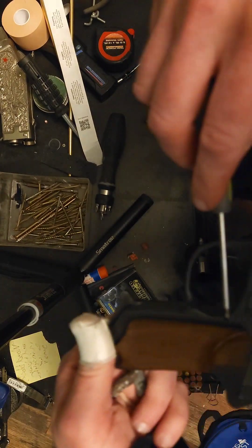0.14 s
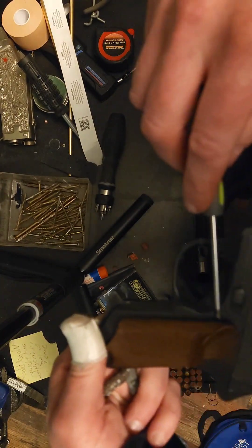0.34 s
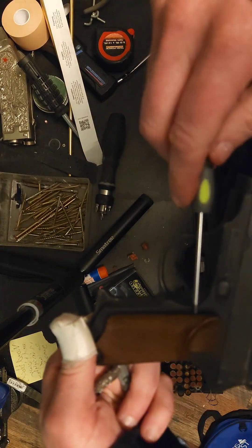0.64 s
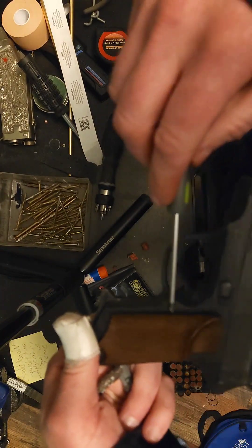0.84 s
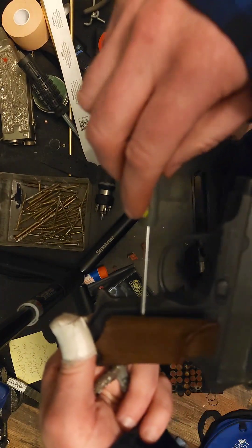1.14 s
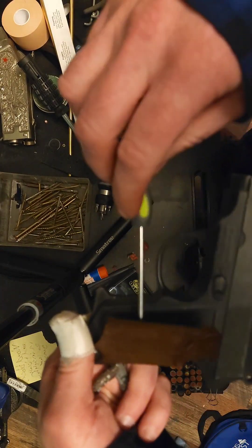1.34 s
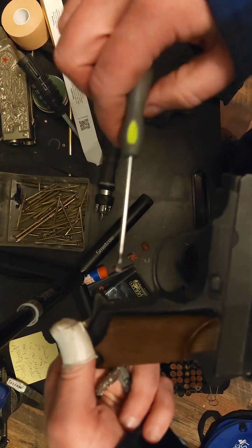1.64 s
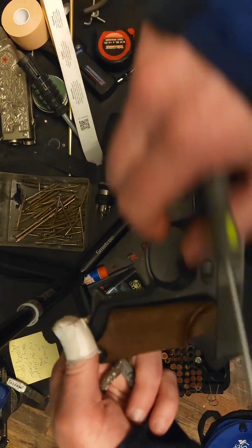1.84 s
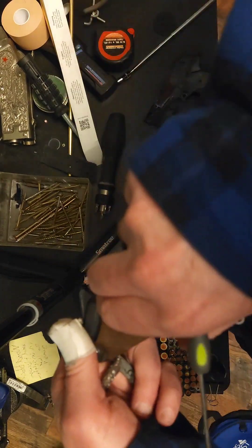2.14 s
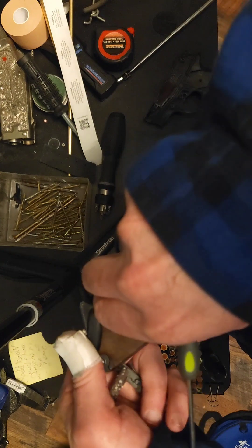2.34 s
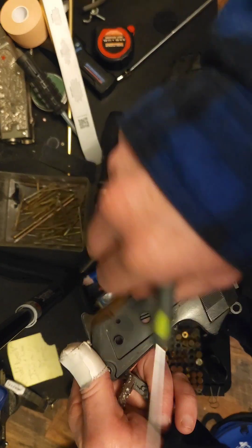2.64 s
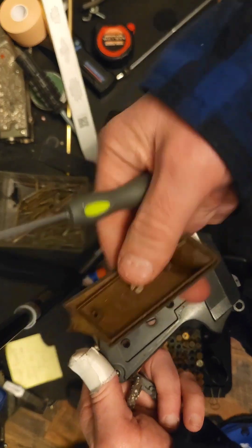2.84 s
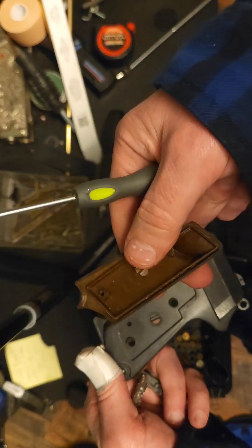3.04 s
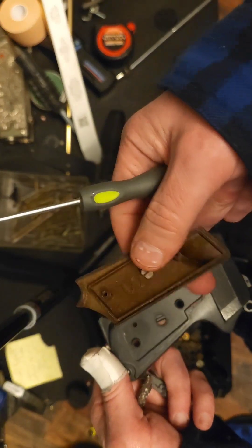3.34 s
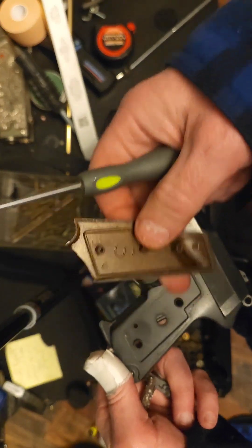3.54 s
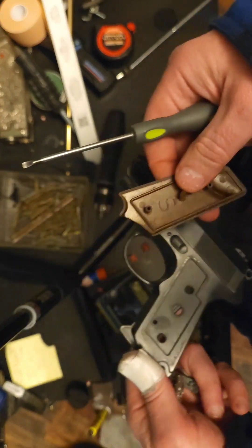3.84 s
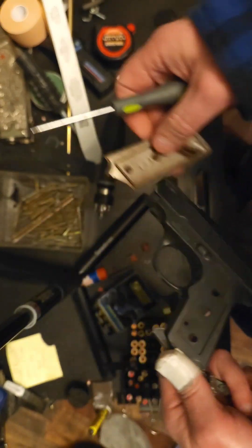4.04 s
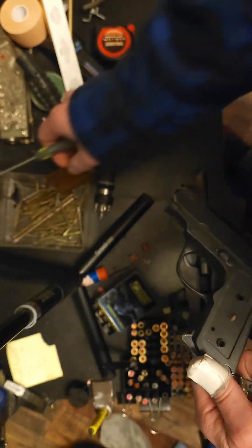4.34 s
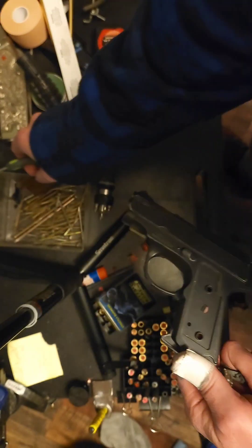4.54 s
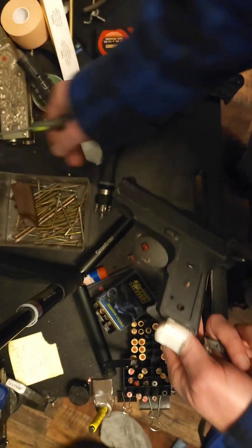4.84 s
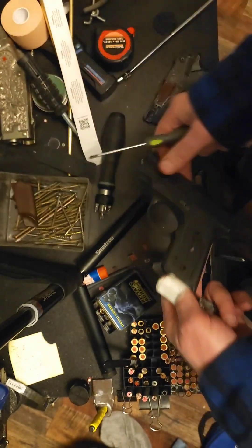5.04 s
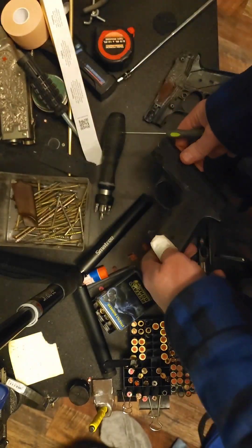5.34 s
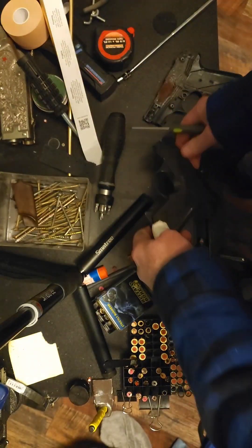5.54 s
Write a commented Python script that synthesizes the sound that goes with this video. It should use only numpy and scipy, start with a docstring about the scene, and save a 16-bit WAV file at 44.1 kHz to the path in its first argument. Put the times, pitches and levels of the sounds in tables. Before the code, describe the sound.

Close, quiet workbench sounds over constant mains hum and soft ventilation. A screwdriver blade scrapes and ticks in a screw, then snaps off sharply at about one and a half seconds. Faint knocks, squeaks and rubs follow as a grip panel comes loose. After a near-quiet gap it clatters into a box of screws and rocks to rest, with soft hand bumps last. Stereo microphone, short room reverberation.

```python
"""Over steady mains hum and ventilation noise, a small screwdriver scrapes and ticks on a metal toy,
then snaps off a screw; the grip panel squeaks and rubs loose, then lands in a box of brass screws and
rocks to rest. Sleeves, fingertips and forearm move throughout, with soft bumps of the hands at the end.
Impacts and rubbing are shaped noise exciting resonant bodies; squeaks and hum are sines.
A short, diffuse workshop reverberation follows the sounds of the toy, hands and box."""
import sys
import numpy as np
from scipy import signal
from scipy.fft import rfft, irfft
from scipy.io import wavfile

SR = 44100
rng = np.random.default_rng(int(sys.argv[2]) if len(sys.argv) > 2 else 0)


def dump(signal):
    """Clip the signal to [-1, 1] and save it as 16-bit WAV at the path in sys.argv[1]."""
    limited = np.clip(np.atleast_2d(signal).T, -1, 1)
    pcm = np.round(limited * 32767).astype(np.int16)
    wavfile.write(sys.argv[1], SR, pcm)


N = 251370
T = np.arange(N) / SR  # time [s]
SIZE = 16384  # samples in a body response or a blow, and knots in a random walk
TOP_HZ = 16000  # upper band edge

# ventilation rumble and hiss: (frequency [Hz], level [dB])
AIR_COLOUR = [(25, -13), (50, -17.5), (72, -1.5), (100, -4.5), (125, 1.5), (160, -7.5), (203, 1),
              (260, -17.5), (400, -21), (700, -25), (1200, -31.5), (2200, -33), (5000, -43.5),
              (9000, -49.5), (15000, -45)]
AIR_DB, HUM_HZ, HUM_DB = -62, 120, -62.5

# pushes of the blade in the screw slot: (start [s], length [s], drive level [dB])
SCRAPE_STROKES = [(.07, 0.056, -66.5), (.285, 0.098, -74.5), (.475, 0.035, -75), (.66, 0.065, -68),
                  (.838, 0.095, -51), (.965, 0.13, -52), (1.05, .2, -66.5), (1.205, 0.066, -63),
                  (1.27, 0.077, -70.5), (1.35, 0.1, -71.5), (1.47, 0.17, -57)]
# broad colour of the blade: (frequency [Hz], level [dB])
BLADE_COLOUR = [(300, -28.5), (1100, -14), (2200, -7), (4000, 0.5), (5200, -10), (6200, -14), (7300, -15),
                (8500, -15.5), (10000, -17), (12500, -14), (15000, -9.5)]
# blade held against the screw: (frequency [Hz], t60 [s], level over the broad colour [dB])
BLADE_RESONANCES = [(3400, .017, 20), (4310, .008, 8), (4860, .016, 19), (7170, .013, 19), (7750, .01, 10),
                    (9450, .008, 12), (11150, .01, 12)]
# frame rasping under a hard-pressed blade: (frequency [Hz], level [dB])
RASP_COLOUR = [(300, -24), (1200, -11.5), (2300, -6.5), (3500, -0.5), (6500, -8), (10000, -15),
               (15000, -11)]
# resonances of the rasping frame: (frequency [Hz], t60 [s], level over the broad colour [dB])
RASP_RESONANCES = [(2244, 0.019, 8), (2980, 0.028, 8), (5187, .025, 9.7), (5800, .025, 6)]

# forearm shuffling over the bench: (start [s], length [s], level [dB])
SHUFFLE_STROKES = [(.07, 0.088, -66), (1.95, 0.071, -63.5), (2.02, 0.24, -71.5), (2.35, .07, -67.5),
                   (2.67, 0.075, -67.5), (2.78, 0.034, -71.5), (2.83, 0.047, -67), (4.35, 0.11, -72.5),
                   (4.48, 0.45, -71), (4.68, 0.13, -63.5), (5.48, 0.18, -81)]
# broad colour of the forearm on the bench: (frequency [Hz], level [dB])
ARM_COLOUR = [(200, -14.5), (450, -4), (800, 0), (1050, -2), (1450, -2), (2200, -6.5), (3500, -17),
              (8000, -27.5)]

# blade and panel clacking on the frame:
# (time [s], level [dB], bass [dB], treble [dB], chatter decay [ms])
FRAME_TICKS = [(.101, -56, 12, -32, 25.6), (.8155, -60.5, 8, -29, 2.1), (.9075, -34.5, -8, 6, 1.72),
               (.927, -57, -1, -31, 9.9), (.940, -46, -7, -14, 8.8), (.973, -50, -2, -31, 12),
               (1.520, -20, -2, 4, 1.9), (1.5395, -30.5, 0, 5.5, 5.7), (1.5585, -32.5, 2.5, -6.5, 9.7),
               (1.5935, -43.5, 7, -4.5, 7.1), (1.611, -53.5, 9, -5, 1.8), (2.1825, -46, 7.5, 4, 3.3),
               (2.1895, -42.5, 6, -4.5, 2.4), (2.379, -58.5, 13, -1, 6.5), (2.665, -45.5, 0, 8, 5.8),
               (2.672, -44, 0.5, 5, 13), (2.710, -54.5, 10, 12, 11)]
# broad colour of the toy's frame: (frequency [Hz], level [dB])
FRAME_COLOUR = [(200, -38.5), (500, -20), (1000, -9.5), (1800, -8), (2600, 0.5), (3400, 1.5), (4600, -3),
                (5800, -5), (7300, -8.5), (9200, -9), (11000, -10.5), (15000, -9.5)]
# resonances of the frame: (frequency [Hz], t60 [s], level over the broad colour [dB])
FRAME_RESONANCES = [(1715, 0.13, 9), (2528, 0.08, 5), (3480, 0.045, 1.5), (4220, 0.063, 10),
                    (4657, 0.064, 8), (6650, 0.051, 6), (7415, 0.018, 8), (9136, 0.036, 6.5),
                    (10730, 0.05, 8)]
# blade tip meeting the screw: (time [s], level [dB], bass [dB], treble [dB], chatter decay [ms])
BLADE_TOUCHES = [(.6465, -39, -13, 5, 2.5), (.684, -61, 6, 3, 1.9), (.741, -57.5, -20, 3.5, 3.6),
                 (.8465, -47, 4, -11, 8.8), (.853, -47, -3, 4, 7.4), (2.287, -47.5, 8.5, -8, 10.3),
                 (2.548, -51, 7.5, -15, 2.68)]
# place of ticks and touches, ending to the right: (time [s], left minus right [dB])
TOY_PLACE = [(.65, -1.5), (1.5, -0.4), (2.2, -3.5), (2.7, -6)]

# sweeps of a sleeve: (start [s], length [s], level [dB])
SLEEVE_STROKES = [(1.015, 0.093, -61.5), (1.73, .25, -73), (2.1, .55, -73.5), (2.66, 0.31, -71),
                  (4.37, 0.77, -72), (5.17, 0.57, -75)]
# hiss of a sleeve: (frequency [Hz], level [dB])
SLEEVE_COLOUR = [(500, -8), (2400, -6), (4200, -1), (6000, -4), (8200, 3), (11000, -3), (15000, 1.5)]

# toy knocked as the hand shifts: (time [s], level [dB], bass [dB], treble [dB], chatter decay [ms])
HAND_KNOCKS = [(1.978, -56.5, 16.5, -5.5, 8), (1.994, -53, 6, 4.5, 5.9), (1.9997, -30.5, 0.5, -0.5, 0.8)]
# toy damped in the hand: (frequency [Hz], level [dB])
HELD_TOY_COLOUR = [(200, -42), (600, -18), (820, -26.5), (1400, -2), (1900, -16.5), (2300, -20),
                   (2800, -30.5), (3450, -13), (4300, -27), (5100, -13), (6000, -37), (7600, -32),
                   (11000, -44.5), (15000, -39)]

# faint squeak, falling overall: (time [s], frequency [Hz], level [dB])
HIGH_GLIDE = [(2.08, 655, -78), (2.15, 596, -70), (2.21, 538, -84), (2.25, 554, -68), (2.295, 608, -67),
              (2.34, 499, -68), (2.46, 476, -75), (2.68, 430, -82.5)]
# shorter, lower squeak under it: (time [s], frequency [Hz], level [dB])
LOW_GLIDE = [(2.155, 425, -76), (2.2, 378, -70), (2.245, 373, -76)]

# grip panel worked loose against the frame: (start [s], length [s], level [dB])
PANEL_STROKES = [(2.115, 0.066, -69), (2.19, 0.054, -64), (2.36, 0.064, -64), (2.415, 0.071, -66),
                 (2.47, 0.073, -57), (2.525, 0.063, -64.5)]
# resonances of the panel: (frequency [Hz], t60 [s], level over the broad colour [dB])
PANEL_RESONANCES = [(1725, .07, 22), (2620, .04, 9), (3350, .028, 16), (4710, .03, 7)]

# fingertips slipping on the toy: (start [s], length [s], level [dB])
FINGER_STROKES = [(3.41, 0.12, -56.5), (3.59, 0.057, -73.5), (3.65, 0.075, -68), (3.88, 0.11, -75.5),
                  (4.04, 0.12, -67), (5.39, 0.15, -63.5), (5.56, 0.058, -64.5), (5.61, 0.074, -69.5)]
# broad colour of the fingertip slips: (frequency [Hz], level [dB])
FINGER_COLOUR = [(500, -8), (2400, -5.5), (3400, -2), (4500, 2), (6000, 0), (8000, 1.5), (11000, -2),
                 (15000, 3)]
# toy under the fingertips: (frequency [Hz], t60 [s], level over the broad colour [dB])
FINGER_RESONANCES = [(3450, 0.013, 12), (5480, .014, 2), (7640, .012, 1), (9250, 0.013, -2.5)]

# panel landing and screws settling:
# (time [s], level [dB], bass [dB], treble [dB], chatter decay [ms])
DROP_BLOWS = [(4.7385, -24.5, -0.5, 3, 7.2), (4.7535, -25.5, 3.5, 7, 8.8), (4.7705, -22, -1.5, 6, 7.4),
              (4.7745, -16.5, 1, 3, 3.2), (4.782, -26.5, -0.5, 8, 21), (4.837, -18.5, -6.5, 7, 6.4),
              (4.862, -30.5, -4.5, -2, 7), (4.879, -41, -16, -20, 3.5), (4.895, -39.5, -26, 0, 4.6),
              (4.9255, -37, -6, 14, 1.2), (4.939, -35.5, -5, -18, 5.7), (4.9625, -40.5, 2, -16, 5.9)]
# broad colour of the box of screws: (frequency [Hz], level [dB])
BOX_COLOUR = [(80, -12.5), (170, -9.5), (300, -11.5), (470, -15.5), (700, -11.5), (1200, 1), (1900, -1),
              (2600, -1.5), (3400, -1), (4600, -4), (6000, -10.5), (8000, -11.5), (12000, -16),
              (15000, -17.5)]
# resonances of the box: (frequency [Hz], t60 [s], level over the broad colour [dB])
BOX_RESONANCES = [(364, 0.13, 3.9), (678, 0.048, 11), (936, 0.22, 2.7), (1532, 0.077, 1.7),
                  (1890, 0.04, 9.6), (2097, 0.05, 1), (2225, 0.046, 3), (2960, 0.13, 1.8),
                  (3360, 0.013, 3.1), (3305, 0.044, 3.3), (4230, 0.17, 2.7), (10700, 0.031, 4.5),
                  (11600, 0.01, 4.4)]
ROCK_S, ROCK_GAP_S, ROCK_SHRINK = 5.0355, 0.045, 0.63  # first blow, first gap, gap ratio
ROCK_DB, ROCK_LOSS_DB = -40.5, 12  # first rocking blow, loss from blow to blow

# soft bumps of the hands on the bench: (start [s], length [s], level [dB])
BUMP_STROKES = [(5.16, .12, -55.5), (5.27, 0.16, -61), (5.45, 0.082, -60)]
# broad colour of the bench: (frequency [Hz], level [dB])
BENCH_COLOUR = [(40, -24.5), (85, 2), (120, -3.5), (160, 4.5), (220, -5.5), (300, -26.5), (800, -44.5)]

# workshop reverberation: (frequency [Hz], t60 [s])
ROOM_DECAY = [(250, 0.32), (700, 0.25), (2000, 0.13), (5000, 0.17), (9000, 0.11), (15000, 0.17)]
# unequal shading of the two microphone ports: (frequency [Hz], left minus right [dB])
PORT_SHADING = [(200, 0.5), (1400, 3.5), (4400, 0.5), (6000, 9), (9500, 9.5), (11700, 1), (15000, 0.5)]


def amp(db):
    """Decibel law: level to amplitude gain."""
    return 10 ** (np.asarray(db) / 20)


def unit(x):
    """Power normalisation: scale to rms 1."""
    return x / np.sqrt(np.mean(x ** 2))


def curve(rows, axis=1):
    """Linear interpolation in time of one column of a table."""
    rows = np.array(rows)
    return np.interp(T, rows[:, 0], rows[:, axis])


def over_hz(points, size):
    """Interpolation on a logarithmic frequency scale, over the bins of a transform."""
    hz, value = np.transpose(points)
    return np.interp(np.log(np.fft.rfftfreq(size, 1 / SR) + 1), np.log(hz), value)


def response(points, modes=()):
    """Modal superposition: a minimum-phase broad colour with exponentially ringing modes on top."""
    cepstrum = irfft(np.log(amp(over_hz(points, SIZE))))
    # folding the cepstrum onto positive time makes the response causal
    cepstrum[1:SIZE // 2] *= 2
    cepstrum[SIZE // 2 + 1:] = 0
    f = np.fft.rfftfreq(SIZE, 1 / SR)
    rings = 0
    for hz, t60, db in modes:
        rings = rings + amp(db) / (1 + 2j * np.pi * (f - hz) * t60 / np.log(1000))
    return np.exp(rfft(cepstrum)) * (1 + rings)


def through(x, body):
    """Linear filtering: convolve a stereo force with a body's impulse response; rms 1."""
    impulse = irfft(body)[None]
    return unit(signal.fftconvolve(x, impulse, axes=1)[:, :N])


def noise(size, side):
    """Partial coherence: stereo noise with a given ratio of side to mid."""
    mid, spread = rng.standard_normal((2, size))
    return np.array([mid + side * spread, mid - side * spread]) / np.hypot(1, side)


def pan(db):
    """Interaural level difference: gains for left minus right in dB."""
    return amp(np.array([[1], [-1]]) * db / 2)


def walk(rate):
    """Random modulation: Gaussian knots, `rate` per second, joined by lines; spread near 1."""
    knots = rng.standard_normal(SIZE)
    return np.interp(T * rate, np.arange(SIZE), knots)


def strokes(rows, attack, release):
    """Amplitude envelope: each movement swells, holds and fades over set shares of its length."""
    out = np.zeros(N)
    for start, length, db in rows:
        done = (T - start) / length
        ramp = np.clip(np.minimum(done / attack, (1 - done) / release), 0, 1)
        out += amp(db) * np.sin(np.pi / 2 * ramp)
    return out


def friction(pressure, body, grit_db, judder_db, pan_db):
    """Frictional excitation: dense tiny slips of uneven size ring a body."""
    unevenness = amp(grit_db * walk(900) + judder_db * walk(90))
    slips = noise(N, 0.63) * unevenness
    return through(slips, body) * pressure * pan(pan_db)


def blows(rows, body, click, side, tail_db, tail_s, grit_db, lag_ms, rise_ms):
    """Impact excitation: a sharp contact, uneven chatter and a weaker rattle ring one body."""
    out, t = np.zeros((2, N + SIZE)), np.arange(SIZE) / SR
    ms = t * 1000
    head = int(.011 * SR)  # the level is set over the first 11 ms
    fade = np.cos(np.pi / 2 * t / t[-1]) ** 2
    # the right port hears the blow a little later; frequency here is in kHz
    khz = np.fft.rfftfreq(SIZE, ms[1])
    ports = np.exp(-2j * np.pi * khz * np.array([[0], [lag_ms]]))
    for s, db, bass_db, treble_db, chatter_ms in rows:
        burst = np.exp(-ms / chatter_ms) * (1 - np.exp(-ms / rise_ms))
        rattle = amp(tail_db) * np.exp(-t / tail_s)
        # a new contact size every half millisecond
        sizes = np.clip(rng.standard_normal(SIZE), -2, 2)
        contacts = unit(amp(grit_db * np.interp(2 * ms, np.arange(SIZE), sizes)))
        force = noise(SIZE, side) * contacts * (burst + rattle) / np.sqrt(np.sum(burst ** 2))
        force[:, np.argmax(burst) // 2] += click
        # each blow has its own bass and treble tilt
        tilt = response([(1500, bass_db), (3000, 0.0042), (5500, 0.011), (13000, treble_db)])
        hit = irfft(rfft(force) * body * tilt * ports) * fade
        start = int(s * SR)
        out[:, start:start + SIZE] += hit / np.sqrt(np.mean(hit[:, :head] ** 2)) * amp(db)
    return out[:, :N]


def ventilation():
    """Spatial coherence of noise: the bass is nearly alike in both ears, the hiss is wide."""
    mid, side = rfft(rng.standard_normal((2, N))) * amp(over_hz(AIR_COLOUR, N))
    width_db = [(30, -9.5), (90, -18.0), (200, -15.5), (500, -3.5), (2000, 0.0)]
    side = side * amp(over_hz(width_db, N))
    return unit(irfft(np.array([mid + side, mid - side]), N)) * amp(AIR_DB)


def mains_hum():
    """Simple harmonic tone: a sine of steady level whose phase wanders slightly."""
    return np.sqrt(2) * np.sin(2 * np.pi * HUM_HZ * T + 0.13 * walk(2.7)) * amp(HUM_DB)


def blade_scrapes(bite_db=-52):
    """Load-dependent friction: a light touch sings in the blade; a harder bite rasps the frame too."""
    pressure = strokes(SCRAPE_STROKES, attack=.3, release=.45)
    blade = response(BLADE_COLOUR, BLADE_RESONANCES)
    frame = response(RASP_COLOUR, RASP_RESONANCES)
    singing = friction(pressure, blade, grit_db=4, judder_db=3.5, pan_db=-1.5)
    rasp = friction(pressure, frame, grit_db=6, judder_db=1.0, pan_db=1.0)
    bite = np.clip(pressure / amp(bite_db), 0, 1)
    return singing * (1 - 0.52 * bite) + 0.85 * bite * rasp


def forearm_shuffles():
    """Frictional excitation: the forearm drags over the bench."""
    pressure = strokes(SHUFFLE_STROKES, attack=0.22, release=.45)
    return friction(pressure, response(ARM_COLOUR), grit_db=2, judder_db=4, pan_db=4)


def frame_ticks():
    """Modal response to impact: blade and panel clack against the ringing frame."""
    return blows(FRAME_TICKS, response(FRAME_COLOUR, FRAME_RESONANCES), click=0.43, side=0.71,
                 tail_db=-15.5, tail_s=.012, grit_db=2.5, lag_ms=0.0016, rise_ms=0.43)


def blade_touches():
    """Modal response to impact: the blade tip rings as it meets the screw."""
    return blows(BLADE_TOUCHES, response(BLADE_COLOUR, BLADE_RESONANCES), click=1.0, side=0.68,
                 tail_db=-24.5, tail_s=0.018, grit_db=5, lag_ms=.002, rise_ms=0.28)


def sleeve_sweeps(fibre_db=1.0):
    """Broadband friction: cloth hisses as the arms move."""
    hiss = through(noise(N, 0.9) * amp(fibre_db * walk(300)), response(SLEEVE_COLOUR))
    return hiss * strokes(SLEEVE_STROKES, attack=0.17, release=0.17)


def hand_knocks():
    """Damped impact: the hand-held toy is knocked and has no ringing modes."""
    return blows(HAND_KNOCKS, response(HELD_TOY_COLOUR), click=0.57, side=0.41, tail_db=-23,
                 tail_s=0.017, grit_db=3.5, lag_ms=0.3, rise_ms=.4) * pan(db=-0.5)


def squeak(glide, waver=0.0348):
    """Frequency modulation: a nearly pure tone glides, unsteady in pitch and level."""
    hz = curve(glide) * (1 + waver * walk(270))
    phase = 2 * np.pi * np.cumsum(hz) / SR
    sliding = (T > glide[0][0]) & (T < glide[-1][0])
    return np.sqrt(2) * np.sin(phase) * amp(curve(glide, axis=2) + 3 * walk(80)) * sliding


def panel_rubs():
    """Frictional excitation: the grip panel rings as it rubs on the frame."""
    pressure = strokes(PANEL_STROKES, attack=0.31, release=0.61)
    body = response(FRAME_COLOUR, PANEL_RESONANCES)
    return friction(pressure, body, grit_db=4.0, judder_db=4, pan_db=-1.0)


def fingertip_slips(skin_db=4):
    """Frictional excitation: slipping skin sounds the toy under the fingertips."""
    slips = noise(N, 1.02) * amp(skin_db * walk(200))
    rubbing = through(slips, response(FINGER_COLOUR, FINGER_RESONANCES))
    return rubbing * strokes(FINGER_STROKES, attack=0.32, release=0.86)


def panel_drop():
    """Modal response to impact: panel and screws ring the box, ending with the rocking blows."""
    return blows(DROP_BLOWS + rocking(), response(BOX_COLOUR, BOX_RESONANCES), click=0.4, side=0.58,
                 tail_db=-15.0, tail_s=0.021, grit_db=2.5, lag_ms=0.055, rise_ms=.7) * pan(db=-1.2)


def rocking(count=4, bass_db=1, treble_db=-14, chatter_ms=4):
    """Energy loss at each impact: the rocking panel's blows come ever sooner and weaker."""
    rows, s = [], ROCK_S
    for k in range(count):
        rows.append((s, ROCK_DB - k * ROCK_LOSS_DB, bass_db, treble_db, chatter_ms))
        s += ROCK_GAP_S * ROCK_SHRINK ** k
    return rows


def hand_bumps():
    """Low-frequency response to a soft contact: the hands bump on the bench."""
    thud = through(noise(N, 0.09), response(BENCH_COLOUR))
    return thud * strokes(BUMP_STROKES, attack=0.27, release=0.5)


def room(x, wet_db, gap_s=0.0051):
    """Diffuse reverberation: noise decays at a rate set by frequency, mostly sooner in the treble."""
    f, t, z = signal.stft(noise(2 * SIZE, .75), SR, nperseg=256)
    hz, t60 = np.transpose(ROOM_DECAY)
    decay_db = -60 * t / np.interp(f, hz, t60)[:, None]
    _, tail = signal.istft(z * amp(decay_db), SR)
    # silent for one gap, then rising to full over a second one
    tail *= np.clip(np.arange(tail.shape[1]) / SR / gap_s - 1, 0, 1)
    tail /= np.sqrt(np.sum(tail ** 2) / 2)
    return x + amp(wet_db) * signal.fftconvolve(x, tail, axes=1)[:, :N]


def scene():
    """Direct-to-reverberant ratio: the toy is close; the box lies further off and sounds wetter."""
    tool = blade_scrapes() + (frame_ticks() + blade_touches()) * pan(curve(TOY_PLACE))
    arms = forearm_shuffles() + sleeve_sweeps() + fingertip_slips() + hand_bumps()
    toy = hand_knocks() + squeak(HIGH_GLIDE) + squeak(LOW_GLIDE) + panel_rubs()
    near = room(tool + arms + toy, wet_db=-18.0)
    far = room(panel_drop(), wet_db=-9.5)
    return ventilation() + mains_hum() + near + far


def record(dry):
    """Linear filtering: each port has its own colour, and a steep low-pass cuts the top."""
    shade = amp(np.array([[1], [-1]]) * over_hz(PORT_SHADING, 2 * N) / 2)
    heard = irfft(rfft(dry, 2 * N) * shade)[:, :N]
    low_pass = signal.ellip(10, .2, 70, TOP_HZ, fs=SR, output="sos")
    return signal.sosfilt(low_pass, heard)


dry = scene()
out = record(dry)
dump(out)
```